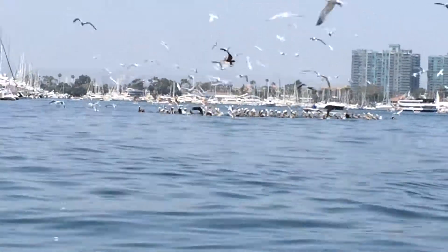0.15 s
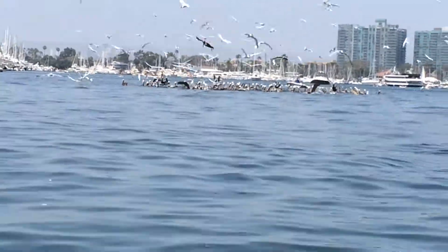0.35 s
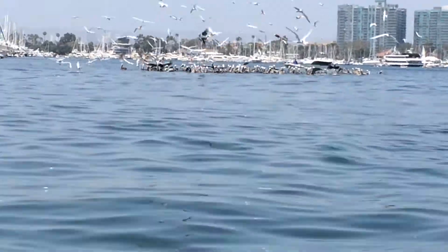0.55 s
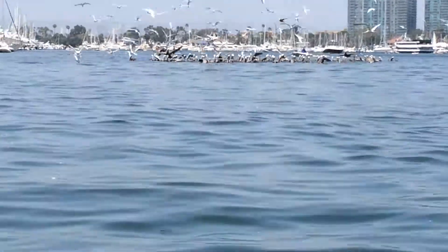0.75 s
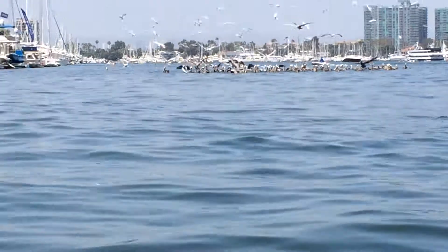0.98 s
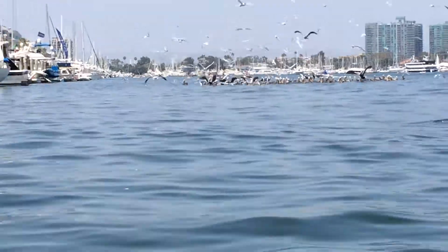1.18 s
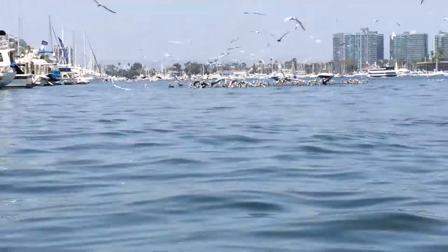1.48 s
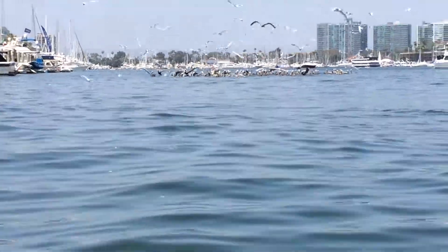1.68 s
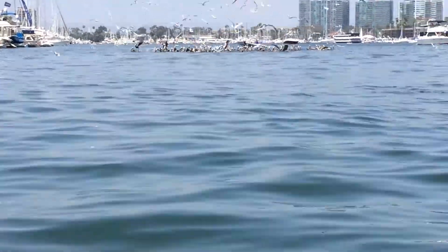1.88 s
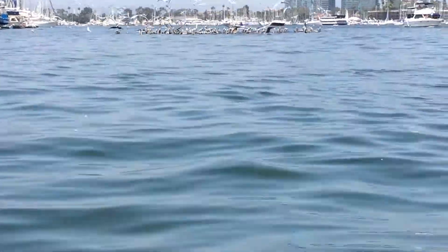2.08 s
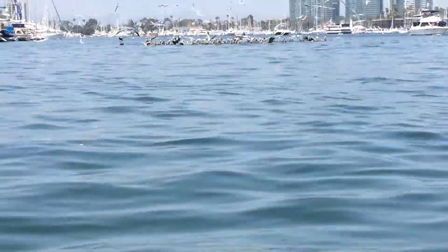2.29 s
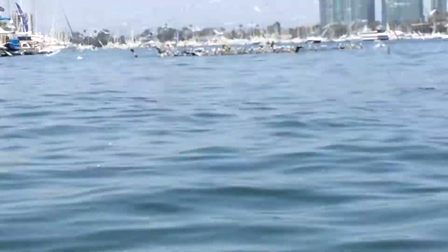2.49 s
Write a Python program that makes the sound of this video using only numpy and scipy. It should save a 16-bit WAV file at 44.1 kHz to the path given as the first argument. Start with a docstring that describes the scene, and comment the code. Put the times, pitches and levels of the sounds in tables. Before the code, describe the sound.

Overlapping gull squawks run throughout, sparser around one second and densest in the second half, over gentle wash, a few early water slaps with bubbly plops, and wind rumbling on an outdoor microphone.

```python
"""Arched gull cries open the scene and overlap with rattling chatter; more gulls call far off.
Each voice is a stack of harmonics, with random modulation and breath noise where it is rough.
A thin scatter of echoes follows the calls, heard from a small boat on open water.
Decaying noise and ringing bubbles make the splashes, and patchy noise the wash with its drips.
Wind buffets the microphone: low noise swells and eases, with short pulses of low tone."""
import sys
import numpy as np
from scipy import signal
from scipy.fft import rfft, irfft
from scipy.io import wavfile
from scipy.ndimage import uniform_filter1d

SR = 44100
rng = np.random.default_rng(int(sys.argv[2]) if len(sys.argv) > 2 else 0)


def master_out(mix):
    """Clip the mix to full scale and print it as 16-bit PCM to the path in sys.argv[1]."""
    frames = np.transpose(np.atleast_2d(mix))
    ceiling = np.clip(frames, -1, 1)
    pcm = np.round(ceiling * 32767).astype(np.int16)
    wavfile.write(sys.argv[1], SR, pcm)


N = 116865  # length of the scene in samples

# Arched cries of the near gulls. Each row: start in seconds, length in seconds, time to the top in seconds,
# top pitch in Hz, sag as share of pitch per s^2, harmonics 2, 3 and 4 in dB before the swell, roughness 0-1.
NEAR_CRIES = [(0.0, 0.026, 0, 1326, 200, -52, -52, -55, 0.05),
              (0.068, 0.13, 0.034, 1182, 210, -54, -54, -57, 0.3),
              (0.154, 0.04, 0.031, 1525, 116, -47, -50.5, -56, 0.15),
              (0.209, 0.057, 0.022, 1443, 104, -47, -42, -49.5, 0.21),
              (0.213, 0.1, 0.043, 1464, 47, -48.5, -46.5, -70, 0.06),
              (0.28, 0.068, 0.026, 1395, 89, -52, -60, -51, 0.2),
              (0.512, 0.068, 0.034, 1303, 120, -52, -56, -39, 0.14),
              (0.743, 0.031, 0.021, 1360, 395, -47.5, -46, -32, 0.19),
              (0.758, 0.025, 0.0, 1360, 107, -58, -33.5, -38.5, 0.07),
              (0.908, 0.059, 0.032, 1223, 98, -56.5, -41, -53.5, 0.06),
              (1.133, 0.049, 0.029, 1363, 190, -42.5, -70, -36, 0.09),
              (1.315, 0.081, 0.036, 1210, 150, -50.5, -37, -42.5, 0.23),
              (1.327, 0.036, 0.0061, 1366, 123, -45.5, -35.5, -58, 0.26),
              (1.356, 0.047, 0.022, 1312, 124, -65, -64, -38, 0),
              (1.417, 0.054, 0.016, 1259, 124, -43.5, -57, -44, 0.1),
              (1.475, 0.038, 0.003, 1249, 152, -45.5, -42, -37, 0.3),
              (1.524, 0.053, 0.02, 1422, 65, -50.5, -66, -42.5, 0.15),
              (1.579, 0.061, 0.022, 1240, 155, -42.5, -44.5, -40.5, 0.2),
              (1.675, 0.056, 0.024, 1350, 78, -47, -48.5, -51, 0.42),
              (1.729, 0.041, 0.035, 1320, 37, -45.5, -46.5, -54, 0.38),
              (1.792, 0.042, 0.024, 1331, 144, -49, -44.5, -55, 0.23),
              (1.867, 0.029, 0.012, 1337, 250, -34.5, -36.5, -44, 0.22),
              (1.928, 0.043, 0.011, 1287, 177, -31.5, -39, -47, 0.19),
              (1.994, 0.047, 0.022, 1225, 175, -36.5, -51, -36.5, 0.19),
              (2.034, 0.049, 0.01, 1100, 224, -44.5, -44, -46.5, 0.24),
              (2.142, 0.09, 0.036, 1140, 237, -62, -44, -53, 0.05),
              (2.298, 0.05, 0.024, 1277, 94, -39, -56, -40.5, 0.2),
              (2.406, 0.11, 0.027, 1266, 87, -53, -51.5, -56, 0.02),
              (2.49, 0.031, 0.017, 1310, 420, -39.5, -58, -33.5, 0.02),
              (2.511, 0.022, 0.00011, 1302, 500, -43, -36.5, -58, 0),
              (2.524, 0.058, 0.015, 1310, 88, -50.5, -54, -53.5, 0.16),
              (2.626, 0.052, 0.03, 1240, 154, -49.5, -56, -56, 0.29)]
# Short notes of the chatter. Each row: start in seconds, length in seconds, pitch in Hz,
# glide as share of pitch, harmonics 2, 3 and 4 in dB before the swell, roughness 0-1.
CHATTER_NOTES = [(0.13, 0.0055, 1337, 0.09, -61, -42, -51, 0.3),
                 (0.14, 0.016, 1412, -0.12, -53, -48, -55, 0.12),
                 (0.165, 0.013, 1400, -0.04, -51, -45, -52, 0.12),
                 (0.195, 0.019, 1318, -0.0098, -45.5, -45.5, -44.5, 0.26),
                 (0.269, 0.0075, 1220, 0, -60, -45, -50, 0.15),
                 (0.313, 0.0079, 1214, -0.032, -45.5, -47, -56, 0.2),
                 (0.414, 0.016, 1025, -0.081, -75, -43, -66, 0.1),
                 (0.568, 0.012, 1300, 0.25, -59, -44.5, -55, 0.06),
                 (0.591, 0.015, 1266, -0.17, -48, -59, -37.5, 0.33),
                 (0.605, 0.0083, 1283, 0.043, -52.0, -47.5, -39, 0.2),
                 (0.625, 0.011, 1175, -0.11, -40.5, -64, -38.5, 0.07),
                 (0.653, 0.012, 1078, -0.038, -37.5, -67, -49, 0.22),
                 (0.677, 0.015, 1067, -0.053, -37, -65.0, -49, 0.13),
                 (0.701, 0.019, 1226, -0.048, -47, -62, -47, 0.77),
                 (0.726, 0.014, 1112, 0.1, -45.5, -64, -43, 0.3),
                 (0.781, 0.013, 1153, -0.048, -47.5, -47.5, -41.5, 0.2),
                 (1.275, 0.0075, 1105, 0.064, -44.5, -40, -50, 0.1),
                 (1.294, 0.0084, 1290, 0.24, -49, -40, -60, 0.21),
                 (1.306, 0.013, 1263, -0.15, -49.0, -39.5, -52, 0.25),
                 (1.356, 0.0093, 1110, -0.099, -39, -47, -48, 0),
                 (1.372, 0.0081, 1242, -0.082, -44, -35, -43, 0.3),
                 (1.392, 0.0077, 1150, 0.15, -49, -43, -41, 0),
                 (1.399, 0.013, 1130, -0.097, -38.5, -59, -39.5, 0),
                 (1.411, 0.0095, 1123, 0.14, -50, -35.5, -39, 0.05),
                 (1.428, 0.0075, 1150, -0.012, -50, -37, -48, 0.3),
                 (1.451, 0.024, 1171, -0.027, -56, -40.5, -39, 0.38),
                 (1.463, 0.0081, 1120, -0.16, -41.5, -38.5, -52, 0.2),
                 (1.493, 0.0167, 1203, -0.17, -60, -39, -53, 0.26),
                 (1.494, 0.0134, 1397, -0.18, -45.5, -49, -38.5, 0.13),
                 (1.514, 0.0073, 1130, -0.056, -43, -36.5, -52, 0.1),
                 (1.544, 0.0094, 1171, 0.04, -41.5, -38.5, -44, 0.15),
                 (1.562, 0.0077, 1103, 0.1, -39.5, -41, -42, 0),
                 (1.641, 0.0084, 1095, 0.035, -47, -46.5, -49, 0.42),
                 (1.783, 0.012, 1170, 0.2, -42, -59, -48.5, 0.7),
                 (1.815, 0.011, 1193, -0.12, -34.5, -50, -41.5, 0.26),
                 (1.825, 0.0086, 1147, 0.2, -33, -50, -48, 0.42),
                 (1.836, 0.0096, 1176, -0.2, -31.5, -47, -41, 0.3),
                 (1.85, 0.018, 1183, 0.0059, -34, -47, -42.5, 0.34),
                 (1.89, 0.0074, 1230, 0.02, -36, -59, -36.5, 0.1),
                 (1.897, 0.01, 1117, 0.085, -30, -56, -43, 0.23),
                 (1.912, 0.015, 1180, -0.019, -33.5, -54, -38.5, 0.42),
                 (1.948, 0.018, 1200, -0.08, -35.5, -62, -39, 0.29),
                 (1.972, 0.014, 1158, 0.035, -33.5, -50, -38, 0.28),
                 (1.99, 0.01, 1120, 0.088, -33, -57, -42, 0.2),
                 (2.18, 0.018, 1293, 0.085, -50, -40, -49, 0.17),
                 (2.209, 0.013, 1230, -0.16, -40, -43.5, -36.5, 0.2),
                 (2.23, 0.0073, 1164, -0.024, -37.5, -36, -35.5, 0.17),
                 (2.262, 0.0096, 1184, -0.012, -44, -38.5, -37.5, 0.29),
                 (2.28, 0.0096, 1150, 0.17, -41, -40.5, -41, 0.28),
                 (2.316, 0.012, 1295, 0.13, -46, -40, -51, 0.44),
                 (2.337, 0.013, 1303, -0.098, -48, -55, -38.5, 0.3),
                 (2.338, 0.016, 1168, -0.069, -45, -38.5, -41, 0.22),
                 (2.354, 0.013, 1255, -0.08, -45, -42.5, -45, 0.5),
                 (2.371, 0.014, 1142, -0.091, -42, -51, -42, 0.3),
                 (2.402, 0.012, 1070, -0.035, -41, -51, -46.0, 0.1),
                 (2.427, 0.015, 1053, 0.0045, -44.0, -54, -51, 0.4),
                 (2.452, 0.013, 1080, 0.014, -45.5, -61.0, -51, 0),
                 (2.475, 0.011, 1254, -0.16, -44, -45.5, -44.5, 0.52)]
# Harmonics 5 to 12 against the strong even or odd ones. Each row: frequency in Hz, level in dB.
OVERTONE_SPECTRUM = [(5200, -23), (6300, -17), (7600, -17.5), (9000, -22), (10500, -22), (13000, -27.5),
                     (15500, -48)]
# Colour of the breath noise in a rough call. Each row: frequency in Hz, relative density in dB per Hz.
BREATH_SPECTRUM = [(500, -29), (1300, 10), (1700, 7), (2300, 20), (2950, -4), (3700, 22), (5100, -10),
                   (6000, 20), (8000, -31), (15500, -45)]
# Treble control of the near calls. Each row: time in seconds, gain in dB before the offset in near_gulls().
TREBLE_CONTROL = [(.3, -2), (.7, 4), (1.35, 1.5), (1.65, -13), (2.05, -3), (2.3, 7), (2.52, -7)]
# Splashes and laps. Each row: time of the peak in seconds, rise in seconds, fall in seconds,
# level of the slosh in dB, level of the spray in dB.
SPLASH_EVENTS = [(0.1261, 0.001, 0.0054, -34.5, -41), (0.37, 0.002, 0.0037, -35.5, -55),
                 (0.479, 0.023, 0.015, -37, -47), (0.503, 0.016, 0.0093, -47.5, -37),
                 (1.023, 0.00086, 0.0029, -40, -65), (1.035, 0.00049, 0.0011, -66, -42.5),
                 (2.2, 0.027, 0.015, -67, -46)]
# Colour of the dull slosh. Each row: frequency in Hz, relative density in dB per Hz.
SLOSH_SPECTRUM = [(200, 5.5), (1200, 0), (2500, -8), (15000, -29)]
# Colour of the bright spray and the drips. Each row: frequency in Hz, relative density in dB per Hz.
SPRAY_SPECTRUM = [(500, 5.5), (2000, 10), (4500, 5), (6200, 1), (8000, 6), (9400, -7.5), (11500, -2),
                  (15500, -24)]
# Ringing bubbles. Each row: start in seconds, frequency in Hz, peak in dB, twice the rise time in seconds.
RINGING_BUBBLES = [(.339, 1480, -37, .0015), (1.131, 1680, -38, .003), (.4745, 986, -27.5, 0.003),
                   (.483, 834, -26, 0.0016), (2.194, 600, -34, 0.004)]
# Colour of the wash of small waves. Each row: frequency in Hz, relative density in dB per Hz.
WASH_SPECTRUM = [(100, -37), (300, 6), (520, 4), (800, -4), (1300, -5.5), (2400, -9), (4500, -15),
                 (8500, -23.5), (13000, -31.5), (15500, -38)]
# Course of the wash. Each row: time in seconds, level in dB.
WASH_LEVEL = [(0, -46), (.3, -44.5), (.65, -47), (1.6, -47), (1.95, -49.5), (2.2, -42), (2.6, -48)]
# Course of the wind. Each row: time in seconds, level of the rumble in dB, level of the gusts in dB.
WIND_LEVELS = [(0, -37.5, -39), (.15, -47.5, -42), (.29, -44, -34.5), (.44, -40, -38.5), (.72, -49, -32.5),
               (.86, -37.5, -32.5), (1.0, -44, -41.5), (1.6, -38.5, -39.5), (1.79, -34.5, -32.5),
               (1.96, -38, -32.5), (2.07, -39, -41), (2.26, -35, -40), (2.39, -51, -43.5),
               (2.65, -39.5, -40.5)]
# Deep wind rumble. Each row: frequency in Hz, relative density in dB per Hz.
RUMBLE_SPECTRUM = [(18, -37), (32, -36), (55, -2), (100, 3), (160, -3.5), (400, -58.5)]
# Gusts above the rumble. Each row: frequency in Hz, relative density in dB per Hz.
GUST_SPECTRUM = [(80, -5.5), (140, -2), (205, -2), (300, -10), (450, -24), (1000, -58)]
# Single buffets. Each row: centre in seconds, peak in dB, frequency in Hz, time from peak to 1/e in seconds.
WIND_BUFFETS = [(.296, -22, 109, 0.0041), (.5105, -20, 94, 0.0057), (1.132, -30, 80.6, 0.0058),
                (1.948, -20, 140.6, 0.0088), (2.216, -31, 91, 0.0085)]

# Roughness of a voice; each strength is multiplied by the roughness of the call
JITTER, JITTER_HZ = 0.058, 353  # rms share of pitch, speed
RASP, RASP_WIDTH_HZ = 0.62, 990  # rms share of each harmonic, speed
FLUTTER, FLUTTER_HZ = 1.1, 450  # share of the tone, rate
THROB, THROB_HZ = 1.6, 52  # share of a cry, rate
HISS_DB = -6  # breath noise against the tone

# Balance of the harmonics
FUNDAMENTAL_DB, FUNDAMENTAL_EVEN_DB = -10.5, -23  # against harmonic 3, against harmonic 2
FUNDAMENTAL_DB_PER_OCTAVE, USUAL_PITCH_HZ = 30, 1300
ODD_LEAK_DB = -18  # share of the even strength that leaks into the odd overtones
OVERTONE_BLUR = .7  # rms flicker of an overtone before levelling
TREBLE_FROM_HZ = 9400

# Shape of the calls
CRY_ATTACK_S, CRY_RELEASE_S = .007, .009
CRY_DB, CRY_SWELL_DB, CRY_SAG_FADE_DB = -1.5, 2, 115  # sag fade per squared share of pitch lost
NOTE_ATTACK_S, NOTE_RELEASE_S = .002, .002
NOTE_DB, NOTE_SWELL_DB = 1.5, 3
NOTE_SCOOP = .025  # share of pitch

# Distance and reflections
FAR_DB, FAR_SPREAD_DB, FAR_PER_S = -68, 3, 22  # harmonic level, spread either way, cries per second
ECHO_DB, ECHO_T60_S = -18, .17

# Water
SPRAY_GRAIN_DB, WASH_PATCH_DB = 4, 3  # dB per rms of the random grain or patches
DRIPS_DB, DRIPS_PER_S = -61, 55

# Recording chain
LOW_CUT_HZ, EDGE_HZ = 33.5, 15560


def near_gulls():
    """Superposition: the cries and chatter of the closest birds add, now brighter, now duller."""
    calls = np.zeros(N)
    for start, *row in NEAR_CRIES:
        add(calls, start - CRY_ATTACK_S / 2, cry(*row))
    for start, *row in CHATTER_NOTES:
        add(calls, start - NOTE_ATTACK_S / 2, note(*row))
    high_pass = signal.butter(2, TREBLE_FROM_HZ, "high", fs=SR, output="sos")
    treble = signal.sosfiltfilt(high_pass, calls)
    return calls + treble * (curve(TREBLE_CONTROL) - 1.5)


def cry(length, top_s, top_hz, sag, db2, db3, db4, rough):
    """Parabolic glide: pitch and loudness arch, the voice fades as pitch sags, and throbs if rough."""
    t, envelope = gate(length, CRY_ATTACK_S, CRY_RELEASE_S)
    drop = np.minimum(sag * (t - top_s) ** 2, .5)  # share of the top pitch
    ends = (2 * t / length - 1) ** 2  # 0 in the middle, 1 at both ends
    swell = amp(CRY_DB - CRY_SWELL_DB * ends - CRY_SAG_FADE_DB * drop ** 2)
    throb = 1 + THROB * rough * np.cos(2 * np.pi * (THROB_HZ * t + rng.random()))
    return envelope * swell * throb * voice(top_hz * (1 - drop), db2, db3, db4, rough)


def note(length, mid_hz, glide, db2, db3, db4, rough):
    """Frequency glide: a short sliding note, loudest where its pitch scoops down in the middle."""
    t, envelope = gate(length, NOTE_ATTACK_S, NOTE_RELEASE_S)
    ends = (2 * t / length - 1) ** 2
    slide = glide * (t / length - .5)
    scoop = NOTE_SCOOP * (ends - ends.mean() / 2)
    swell = amp(NOTE_DB - NOTE_SWELL_DB * ends)
    return swell * envelope * voice(mid_hz * (1 + slide + scoop), db2, db3, db4, rough)


def voice(hz, db2, db3, db4, rough):
    """Fourier synthesis: harmonics share one jittering phase; roughness modulates them and adds breath."""
    size = len(hz)
    jittered_hz = hz * (1 + JITTER * rough * wobble(size, JITTER_HZ))
    phase = 2 * np.pi * (np.cumsum(jittered_hz) / SR + rng.random())

    # Even and odd strengths set the overtones above harmonic 4
    even = np.hypot(amp(db4), 0.67 * amp(db2))
    odd = np.hypot(amp(db3), even * amp(ODD_LEAK_DB))
    fundamental = np.hypot(amp(db3 + FUNDAMENTAL_DB), amp(db2 + FUNDAMENTAL_EVEN_DB))
    # High voices pass the throat better
    fundamental = fundamental * amp(FUNDAMENTAL_DB_PER_OCTAVE * np.log2(hz.mean() / USUAL_PITCH_HZ))
    gains = [fundamental, amp(db2), amp(db3), amp(db4)]
    for k in range(5, 13):  # the overtones come and go
        flicker = (1 + OVERTONE_BLUR * wobble(size, JITTER_HZ)) / np.hypot(1, OVERTONE_BLUR)
        strength = odd if k % 2 else even
        gains.append(strength * amp(read(OVERTONE_SPECTRUM, k * hz)) * flicker)

    tone = np.zeros(size)
    for k, gain in enumerate(gains, 1):
        rasp = 1 + RASP * rough * wobble(size, RASP_WIDTH_HZ)
        tone += gain * np.sqrt(2) * np.cos(k * phase) * rasp
    flutter_phase = 2 * np.pi * (FLUTTER_HZ * np.arange(size) / SR + rng.random())
    tone = tone * (1 + FLUTTER * rough * np.cos(flutter_phase))
    hiss = colour(rng.standard_normal(8192), BREATH_SPECTRUM)[:size]
    return tone + amp(HISS_DB) * rough * np.std(tone) * hiss


def gate(length, attack, release):
    """Amplitude envelope: time axis and smooth ramps centred on the start and end of a call."""
    t = np.arange(-attack / 2, min(length + release / 2, .15), 1 / SR)
    rise = np.clip(t / attack + .5, 0, 1)
    fall = np.clip((length - t) / release + .5, 0, 1)
    return t, np.sin(np.pi / 2 * rise * fall) ** 2


def far_gulls():
    """Random superposition: faint cries from the rest of the flock at independent times."""
    calls = np.zeros(N)
    for when, long, high, *spread in rng.random((int(FAR_PER_S * N / SR), 6)):
        length = 0.029 + 0.045 * long
        top_hz = 1100 + 350 * high
        levels = FAR_DB + FAR_SPREAD_DB * (2 * np.array(spread) - 1)
        sound = cry(length, length / 2, top_hz, 113.8, *levels, rough=0.28)
        add(calls, when * N / SR - length / 2, sound)
    return calls


def echo(x):
    """Convolution with sparse decaying taps: a thin scatter off the waves and the boat."""
    t = np.arange(SR // 2) / SR
    present = (rng.random(len(t)) < 2000 / SR) * (t > .002)  # 2000 taps per second after 2 ms
    taps = rng.standard_normal(len(t)) * present
    tail = taps * np.exp(-np.log(1000) * t / ECHO_T60_S)
    return amp(ECHO_DB) * signal.fftconvolve(x, tail / np.linalg.norm(tail))[:N]


def splashes():
    """Transient noise and resonance: water slaps the hull with slosh, grainy spray and ringing bubbles."""
    t, out = np.arange(N) / SR, np.zeros(N)
    slosh = colour(rng.standard_normal(N), SLOSH_SPECTRUM)
    spray = colour(rng.standard_normal(N), SPRAY_SPECTRUM)
    droplets = unit(uniform_filter1d(rng.standard_normal(N), size=40))
    spray = unit(spray * amp(SPRAY_GRAIN_DB * np.minimum(droplets, 2)))
    for s, rise, fall, slosh_db, spray_db in SPLASH_EVENTS:
        envelope = np.exp(-np.maximum((s - t) / rise, (t - s) / fall))
        out += envelope * (amp(slosh_db) * slosh + amp(spray_db) * spray)
    age = t[:SR // 20]
    for s, hz, db, double_rise in RINGING_BUBBLES:
        x = 2 * age / double_rise
        envelope = x * np.exp(1 - x)  # peaks at 1
        add(out, s, amp(db) * envelope * np.sin(2 * np.pi * hz * age))
    return out


def wash():
    """Filtered noise, uneven in time and frequency: patchy hiss of small waves, with sparse drips."""
    cells = signal.stft(rng.standard_normal(N), nperseg=512)[2]
    patches = uniform_filter1d(rng.standard_normal(cells.shape), size=9, axis=0)  # across frequency
    patches = unit(uniform_filter1d(patches, size=6, axis=1))  # across time
    noise = signal.istft(cells * amp(WASH_PATCH_DB * patches), nperseg=512)[1][:N]
    hiss = colour(noise, WASH_SPECTRUM)
    clicks = (rng.random(N) < DRIPS_PER_S / SR) * rng.uniform(0.2, 1, N)
    bursts = signal.lfilter([1], [1, -np.exp(-1 / (0.00099 * SR))], clicks)  # 0.99 ms decay
    drips = colour(bursts * rng.standard_normal(N), SPRAY_SPECTRUM)
    return curve(WASH_LEVEL) * hiss + amp(DRIPS_DB) * drips


def wind():
    """Turbulent pressure as low noise: a rumble and gusts swell and ease, with a few sharp buffets."""
    t, out = np.arange(N) / SR, np.zeros(N)
    times, *levels = np.transpose(WIND_LEVELS)
    for spectrum, db in zip((RUMBLE_SPECTRUM, GUST_SPECTRUM), levels):
        noise = colour(rng.standard_normal(N), spectrum)
        local_rms = np.sqrt(uniform_filter1d(noise ** 2, size=7000))
        out += noise / local_rms * amp(np.interp(t, times, db))
    for s, db, hz, length in WIND_BUFFETS:
        envelope = np.exp(-((t - s) / length) ** 2)
        out += amp(db) * envelope * np.cos(2 * np.pi * hz * (t - s))
    return out


def amp(db):
    """Logarithmic level: decibels to gain."""
    return 10 ** (np.asarray(db) / 20)


def unit(x):
    """Power normalization: scales to rms 1."""
    return x / np.sqrt(np.mean(x ** 2) + 1e-20)


def curve(points):
    """Level interpolation in dB: gain at every sample from (seconds, dB) points."""
    return amp(np.interp(np.arange(N) / SR, *np.transpose(points)))


def read(points, hz):
    """Spectral interpolation: reads dB on a log-frequency axis."""
    f, db = np.transpose(points)
    return np.interp(np.log(hz + 1), np.log(f), db)


def colour(x, spectrum):
    """Linear filtering in the frequency domain: weights by a spectrum, to rms 1."""
    gain = amp(read(spectrum, np.fft.rfftfreq(len(x), 1 / SR)))
    return unit(irfft(rfft(x) * gain, len(x)))


def wobble(size, hz):
    """Gaussian low-pass noise: smooth random motion up to about hz, cut from a stretch of rms 1."""
    f = np.fft.rfftfreq(8192, 1 / SR)
    noise = rng.standard_normal(8192)
    return unit(irfft(rfft(noise) * np.exp(-(f / hz) ** 2)))[:size]


def add(mix, s, sound):
    """Linear superposition: mixes a sound in at s seconds, trimmed to the scene."""
    at = round(s * SR)
    sound = sound[max(-at, 0):]
    part = mix[max(at, 0):][:len(sound)]
    part += sound[:len(part)]


def scene():
    """Superposition of sources: gulls and their echo over wind and water, in one channel."""
    gulls = near_gulls() + far_gulls()
    return (gulls + echo(gulls) + splashes() + wash() + wind())[None]


def record(dry):
    """Band limitation: the microphone's low cut and the recorder's upper band limit."""
    high_pass = signal.butter(2, LOW_CUT_HZ, "high", fs=SR, output="sos")
    cut = signal.sosfiltfilt(high_pass, dry, padtype="even")
    low_pass = signal.firwin(511, EDGE_HZ, window=("kaiser", 9), fs=SR)
    return signal.oaconvolve(cut, low_pass[None], "same")


dry = scene()
out = record(dry)
master_out(out)
```